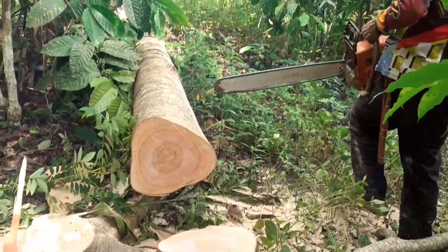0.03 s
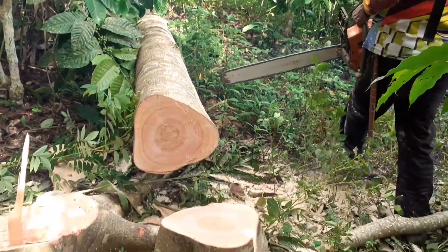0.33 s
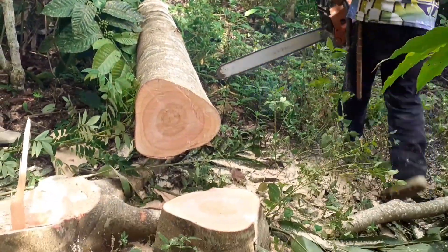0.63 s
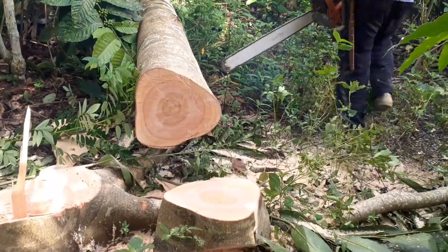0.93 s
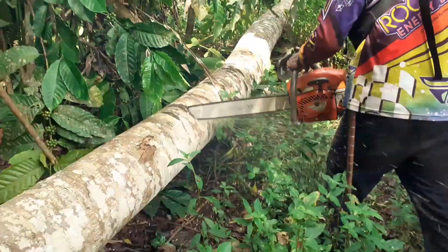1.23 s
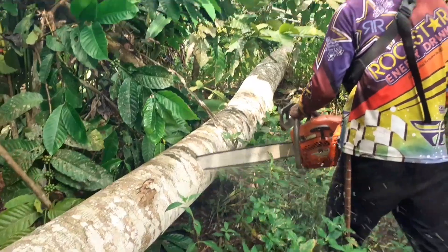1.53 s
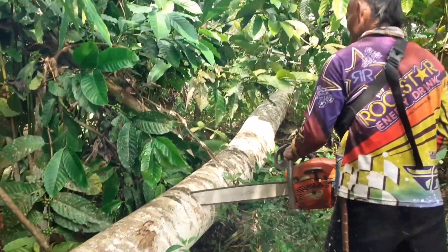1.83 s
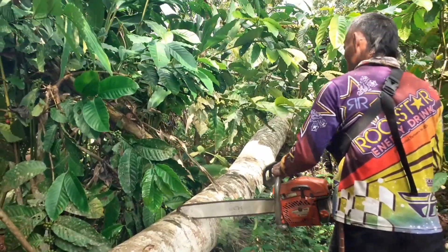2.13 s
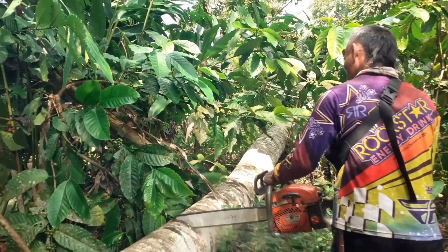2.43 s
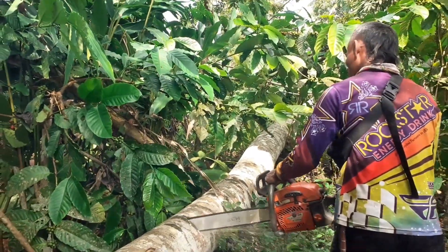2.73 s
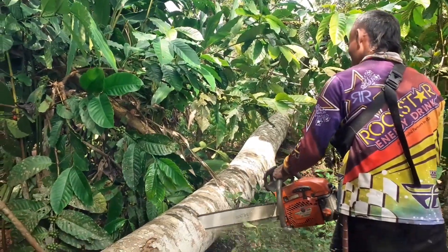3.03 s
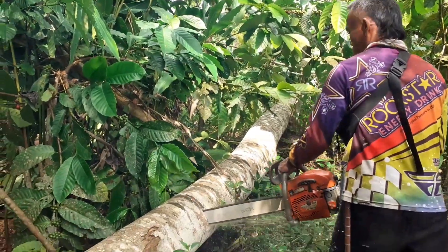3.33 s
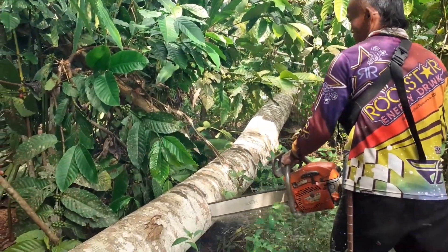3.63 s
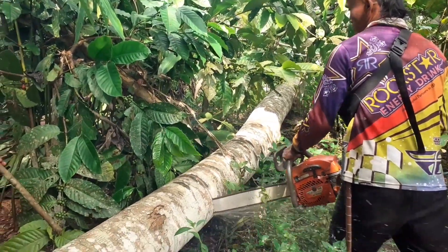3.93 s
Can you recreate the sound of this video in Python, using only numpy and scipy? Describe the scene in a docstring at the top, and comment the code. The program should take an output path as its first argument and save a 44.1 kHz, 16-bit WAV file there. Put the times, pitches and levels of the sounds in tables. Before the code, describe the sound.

Close chainsaw sputtering at idle, then suddenly cutting wood with a loud, rasping roar.

```python
"""A two-stroke chainsaw sinks to a popping idle while its chain coasts to rest and the clutch drum rings.
Hard cut to full throttle in a log, close up: firings ring the muffler, the casing clatters, the chain
rasps and squeals through the wood, and air buffets the microphone underneath.
The throttle is eased once, and the engine stutters back up to speed."""
import sys
import numpy as np
from scipy import signal
from scipy.fft import rfft, irfft
from scipy.io import wavfile
from scipy.ndimage import uniform_filter1d

SR = 44100
rng = np.random.default_rng(int(sys.argv[2]) if len(sys.argv) > 2 else 0)


def master(y):
    """Save y as 16-bit WAV."""
    cut = np.clip(np.atleast_2d(y).T, -1, 1)
    pcm = np.round(cut * 32767)  # scale
    wavfile.write(sys.argv[1], SR, pcm.astype(np.int16))


N = 176400

# wind rumble: freq_hz, gain_db, left_over_right_db
WIND_EQ = [(25, -47, 0), (61, -8, 10.5), (109, -4.5, 12.5), (169, -5, 6.5), (450, -10.5, 10.5),
           (2000, -53, 4)]
# wind fader: time_s, level_db
WIND_FADER = [(1.13, -38.5), (2.3, -32), (3.2, -36), (4, -55)]
# strongest gusts: peak_s, level_db
WIND_GUSTS = [(1.18, -24.5), (1.39, -33.5), (1.478, -26), (1.709, -29), (1.785, -24), (2.03, -24.5),
              (2.14, -24), (2.305, -23), (2.59, -25.5), (2.99, -22.5), (3.25, -27.5), (3.63, -27)]

# soft idle clatter: freq_hz, gain_db, left_over_right_db
TICKOVER_EQ = [(60, -8, 0), (380, 14.5, -0.5), (1400, -9.5, 4), (2050, -3, 2), (2610, -7, 2),
               (6000, -9.5, -4), (15000, -35, 0)]
# loose links shaking: start_s, level_db
LINK_JINGLES = [(.473, -40), (.58, -48), (.632, -48), (.982, -46), (1.09, -50)]
# chain sliding on the bar: freq_hz, gain_db, left_over_right_db
COAST_EQ = [(500, -6.5, 0), (2000, -3, 3), (3000, -7, 4.5), (4780, -6.5, 5), (5800, -1, -9.5),
            (8330, -2, -12), (9700, -11, 6), (12000, -5.5, 7), (14000, 1, 9), (16000, -4.5, -2)]
# sliding chain fader: time_s, level_db
COAST_FADER = [(0, -33), (.25, -40.5), (.45, -46), (.68, -57.5), (.82, -59), (.98, -47), (1.12, -54)]
# idle revs: time_s, turn_rate_hz
IDLE_REVS = [(0, 48), (.13, 42.9), (.3, 38.2), (.42, 36), (.53, 35.8), (.62, 33.6), (.82, 32.7),
             (.95, 34.4), (1.1, 35)]
# one soft puff: freq_hz, gain_db
PUFF_EQ = [(40, -40), (100, -7.5), (160, -3), (225, -4.5), (305, 4), (450, -4), (600, -3), (880, -19.5),
           (1050, -30), (4000, -72)]
# puff and gulp fader: time_s, level_db
PUFF_FADER = [(0, -36.5), (.25, -34.5), (.42, -37), (.8, -37.5), (1.1, -34)]
# hard firings at idle: near_s, bang_accent_db, jerk_accent_db
IDLE_BANGS = [(.121, -4.5, -22), (.192, -8, -23), (.242, -5.5, -2), (.293, -12, -20), (.373, -3.5, -21),
              (.457, -2.5, -0.5), (.539, -9, -20), (.568, -7, -20), (.626, -7, -19), (.656, -5, -24),
              (.715, -5, -11), (.775, -5.5, -17), (.806, -8.5, -22), (.867, -3, -1.5), (.926, -11.5, -20),
              (.956, -1, -0.5), (1.041, -1, -6)]
# one bang: freq_hz, gain_db
BANG_EQ = [(60, -64), (250, 4.5), (450, 3), (600, 9), (800, -6.5), (1000, -15.5), (1250, -11.5),
           (1600, -43), (4000, -39)]

# casing and chain rattle: freq_hz, gain_db, left_over_right_db
CLATTER_EQ = [(1210, -11.5, -17), (2630, -9, 3.5), (3700, 1.5, 5.5), (5470, 1, -2.5), (6500, -2.5, -7),
              (8500, 2, -2.5), (10200, -15.5, 2), (15700, -2.5, -7)]
# chain binding in the cut: peak_s, length_s, pitch_hz, accent_db
CHAIN_SQUEALS = [(1.18, .12, 3290, -44), (1.31, 0.094, 4200, -35), (1.415, .14, 7120, -33.5),
                 (1.48, 0.11, 4320, -34.5), (1.72, 0.09, 4270, -34.5), (2.34, 0.11, 3700, -38),
                 (2.362, 0.34, 4420, -37.5), (2.626, 0.11, 4130, -32), (2.652, 0.15, 3780, -31),
                 (2.898, .24, 4360, -34.5), (2.88, 0.47, 5600, -41), (3.096, 0.23, 4650, -37.5),
                 (3.35, 0.2, 5470, -37), (3.398, 0.29, 3530, -37.5), (3.524, 0.17, 4400, -34.5),
                 (3.62, 0.23, 4680, -35.5), (3.82, 0.56, 4400, -33.5)]
# teeth in wood: freq_hz, gain_db, left_over_right_db
RASP_EQ = [(60, 3, 21), (360, 0.5, -2), (526, -4.5, 17), (840, 4, 3.5), (1920, 4.5, 4), (2920, 2, -1),
           (4170, 5.5, 0.5), (6000, 5, -3.5), (7400, 4, -4.5), (8400, 3, -13), (9500, -2.5, 3.5),
           (11650, -1, 1.5), (14600, 1, 2), (17000, -32, -1)]
# rasp fader: time_s, level_db
RASP_FADER = [(1.13, -19.5), (1.25, -21), (1.6, -22.5), (1.87, -22), (2.15, -21), (2.4, -22), (2.7, -22),
              (3.3, -23), (4, -24)]
# revs in the cut: time_s, firing_rate_hz
SAW_REVS = [(1.14, 184), (1.28, 178.1), (1.45, 178), (1.57, 179.5), (1.76, 186.8), (1.78, 184.5),
            (1.84, 169.3), (1.885, 154), (2.02, 178.8), (2.1, 187.7), (2.17, 183.4), (2.25, 187.7),
            (2.37, 187.3), (2.55, 181.4), (2.86, 174), (3.07, 175.7), (3.22, 171.5), (3.28, 167.2),
            (3.6, 172.9), (3.98, 176.3)]
# spells where every other firing falters: start_s, end_s, depth_ratio
MISFIRES = [(1.215, 1.26, .45), (1.874, 1.912, .7), (2.12, 2.178, .65)]
# muffler from behind, half turned and side on: freq_hz, gain_db
MUFFLER_REAR_EQ = [(90, -44), (175, -5.5), (360, -3.5), (540, -27), (720, -3), (900, 6.5), (1080, -12),
                   (1255, 2), (1440, -13), (1630, -2.5), (1790, -22), (5000, -29)]
MUFFLER_TURNING_EQ = [(90, -39.5), (183, -6), (372, -1.5), (555, -14), (745, 2.5), (930, 6.5), (1115, -4),
                      (1300, 5.5), (1500, -20), (1680, -17), (1870, -2.5), (2060, -16), (5000, -21.5)]
MUFFLER_SIDE_EQ = [(90, -51), (175, -0.5), (350, 1), (520, -8), (700, -5), (870, 7.5), (1050, -6),
                   (1220, 1), (1400, 7), (1570, -13.5), (2050, -13.5), (2265, -1), (2450, -25.5)]
# exhaust fader: time_s, level_db
EXHAUST_FADER = [(1.13, -21.5), (1.5, -22), (1.76, -22.5), (1.83, -22.5), (1.92, -24.5), (2.06, -23.5),
                 (2.5, -22.5), (3.05, -23), (3.35, -23.5), (4, -22)]
# exhaust phase between the ears, the right mostly ahead: freq_hz, left_minus_right_rad
EXHAUST_EAR_PHASE = [(100, 0.99), (700, -0.81), (950, 0.22), (1200, -1.5), (1460, -1.32), (1890, -0.82),
                     (3000, -1.4)]

CUT_S = 1.129  # the idle gives way to the sawing
EASE_S, REOPEN_S, THROTTLE_MOVE_S = 1.79, 1.88, .0044
TURN_S, HALF_TURNED_S, TURNED_S = 1.75, 2.35, 3.07
FOLIAGE_DECAY_S = .011


def undb(db):
    """Decibels to gain."""
    return 10 ** (np.asarray(db) / 20)


def unit(x):
    """Scale to rms 1."""
    return x / np.sqrt(np.mean(x ** 2))


def times():
    """Time of every sample."""
    return np.arange(N) / SR


def curve(rows):
    """Automation: straight lines through (time_s, value) rows."""
    return np.interp(times(), *np.array(rows).T)


def ramp(start, length):
    """Rise from 0 to 1."""
    return np.clip((times() - start) / length, 0, 1)


def swell(at, length):
    """A bell-shaped rise to 1 and fall."""
    return np.exp(-2 * np.sqrt(2) * ((times() - at) / length) ** 2)


def walk(rate_hz):
    """Smooth random drift at rms 1."""
    size = int(SR / rate_hz)
    steps = np.repeat(rng.standard_normal(N // size + 1), size)
    return unit(uniform_filter1d(uniform_filter1d(steps, size), size)[:N])


def freqs():
    """Frequency of every spectrum bin."""
    return np.maximum(np.arange(N // 2 + 1) * SR / N, 1)


def per_bin(rows, column=1):
    """One column of a spectrum table, interpolated over log frequency."""
    rows = np.array(rows)
    return np.interp(np.log(freqs()), np.log(rows[:, 0]), rows[:, column])


def convolve(x, response):
    """Pass a sound through an impulse response."""
    return irfft(rfft(x, 2 * N) * rfft(response, 2 * N))[..., :N]


def body(x, eq):
    """Ring a minimum-phase body of unit energy with the given spectrum."""
    cepstrum = irfft(np.log(undb(per_bin(eq))))
    cepstrum[1:N // 2] *= 2
    cepstrum[N // 2 + 1:] = 0
    response = irfft(np.exp(rfft(cepstrum)))
    return convolve(x, unit(response) / np.sqrt(N))


def resonate(x, hz, widths_hz):
    """Resonances in series, one per width, gain 1 at their shared centre."""
    for width in widths_hz:
        x = signal.lfilter(*signal.iirpeak(hz, hz / width, fs=SR), x)
    return x


def low_pass(x, hz, order):
    """Roll off the top, without delay."""
    return signal.sosfiltfilt(signal.butter(order, hz, fs=SR, output="sos"), x)


def pan(db):
    """Left and right gains; positive leans left."""
    return undb(np.array([[1], [-1]]) * db / 2)


def colour(x, eq):
    """EQ and pan a stereo sound by frequency, at rms 1."""
    return unit(irfft(rfft(x) * undb(per_bin(eq)) * pan(per_bin(eq, column=2))))


def noise(alike_hz=1360):
    """Stereo noise, narrow below a frequency and wide above."""
    mid, side = rfft(rng.standard_normal((2, N)))
    alike = .85 / (1 + (freqs() / alike_hz) ** 4)
    return unit(irfft(mid * np.sqrt(1 + alike) + np.array([[1], [-1]]) * side * np.sqrt(1 - alike)))


def pulses(at, size):
    """Clicks placed between samples with a windowed sinc."""
    index = (at * SR).astype(int)[:, None] + np.arange(-7, 9)
    offset = index - at[:, None] * SR
    shape = np.sinc(offset) * np.cos(np.pi * offset / 16) ** 2
    return np.bincount(np.clip(index, 0, N).ravel(), (shape * size[:, None]).ravel(), N + 1)[:N]


def hits(at, size, decay_s):
    """An envelope of sharp attacks with dying tails."""
    return convolve(pulses(at, size), np.exp(-times() / decay_s))


def scatter(x, decay_s):
    """Dense dying reflections, different for each ear."""
    response = rng.standard_normal((2, N)) * np.exp(-times() / decay_s)
    return convolve(x, unit(response) / np.sqrt(N))


def wind(gust_s=.013):
    """Air tumbles over the microphone: a low rumble with a few stronger gusts."""
    gusts = sum(undb(db) * np.exp(-((times() - at) / gust_s) ** 2) for at, db in WIND_GUSTS)
    tumble = undb(curve(WIND_FADER) + 4.5 * np.tanh(walk(rate_hz=26)))
    return colour(noise(alike_hz=60), WIND_EQ) * np.hypot(tumble, gusts)


def tickover():
    """A steady noise bed for the idling engine's soft clatter."""
    return undb(-43.5) * colour(noise(), TICKOVER_EQ)


def clutch_drum():
    """The drum rings on one thin, steady note."""
    return undb(-52) * unit(resonate(noise(), hz=4720, widths_hz=(150, 500))) * pan(db=-8.5)


def jingles():
    """Short bright shakes of loose links."""
    at, db = np.array(LINK_JINGLES).T
    shimmer = unit(resonate(noise(), hz=13900, widths_hz=(1800, 1800)))
    return hits(at, undb(db), decay_s=.014) * shimmer * pan(db=6)


def coasting_chain(turn_at, turn_size, jerk_at, jerk_db):
    """The slack chain hisses along the bar, ticks every turn and jerks at each bang."""
    jerks = 2 * hits(jerk_at, undb(jerk_db - 41), decay_s=.0086)
    ticks = hits(turn_at, turn_size * undb(-48), decay_s=.002)
    hiss = colour(noise(), COAST_EQ)
    slide = undb(curve(COAST_FADER) + .97 * walk(rate_hz=180))
    link_grain = undb(2 * walk(rate_hz=1500))
    return hiss * (slide + jerks + ticks) * link_grain


def idle(first_turn_s=.011, intake_lag_turns=.43, gulp_db_per_hz=.74, ear_lag_s=54e-6):
    """An exhaust puff and an intake gulp every turn; some firings bang and jerk the chain."""
    t = times()
    revs = curve(IDLE_REVS)
    turns = np.cumsum(revs) / SR
    fired = np.arange(int(turns[-1]) - 2) + np.interp(first_turn_s, t, turns)
    puff_at, gulp_at = np.interp([fired, fired + intake_lag_turns], turns, t)
    size = undb(rng.standard_normal(len(puff_at)))
    puffs = unit(body(pulses(puff_at, size), PUFF_EQ))
    gulps = unit(resonate(body(pulses(gulp_at, size), PUFF_EQ), hz=307, widths_hz=(310,)))
    gulps *= undb(-13 + gulp_db_per_hz * (revs - revs.min()))
    near_s, bang_db, jerk_db = np.array(IDLE_BANGS).T
    bang_at = puff_at[np.abs(puff_at[:, None] - near_s).argmin(axis=0)]  # snap to the nearest puff
    bangs = 2 * body(pulses(bang_at, undb(bang_db - 5)), BANG_EQ)
    engine = (puffs + gulps) * undb(curve(PUFF_FADER)) + bangs
    ears = np.array([np.interp(t - ear_lag_s, t, engine), engine])  # the saw sits to the right
    metal = coasting_chain(puff_at, size, bang_at, jerk_db) + clutch_drum()
    foliage = undb(-27) * scatter(engine, FOLIAGE_DECAY_S)
    return ears + foliage + metal + jingles() + tickover()


def squeals(fire, q=13):
    """Tugged by each firing, the chain rings resonances of the bar as it binds and frees."""
    out = 0
    for at, length, hz, db in CHAIN_SQUEALS:
        ring = resonate(fire, hz, widths_hz=(hz / q, hz / q))
        bind = swell(at, length)
        ring_rms = np.sqrt(np.average(ring ** 2, weights=bind))
        out += undb(db) * bind * ring / ring_rms
    return out * undb(2.5) * pan(db=-4.5)


def clatter(fire, throttle, level_db=-24.5, eased_db=-5):
    """Firings rattle casing and chain along four paths, whose blend drifts as the saw moves."""
    shares = np.array([walk(rate_hz=4) for _ in range(4)])
    shares /= np.linalg.norm(shares, axis=0)
    rattle = sum(share * scatter(fire, decay_s=.017) for share in shares)
    return colour(rattle, CLATTER_EQ) * undb(level_db + eased_db * (1 - throttle))


def rasp(turns, grain_db=1.5, flutter_db=.64):
    """Teeth tear through wood: gritty noise, pulsing faintly with the engine."""
    pulsing = 1 + .033 * np.cos(2 * np.pi * turns)
    grit = undb(grain_db * walk(rate_hz=1200) + flutter_db * walk(rate_hz=60))
    return colour(noise() * pulsing * grit, RASP_EQ) * undb(curve(RASP_FADER))


def misfire_depth(t):
    """Depth of the stutter at the given times."""
    return sum(depth * ((t > start) & (t < end)) for start, end, depth in MISFIRES)


def barks(turns, decay_turns=.5):
    """Unburnt fuel barks every second turn during a stutter."""
    gas = rng.standard_normal(N) * np.exp(-(turns % 2) / decay_turns)
    bark = unit(resonate(gas, hz=774, widths_hz=(1060, 2120)))
    return bark * misfire_depth(times()) * undb(-24.5)


def firings(turns, jitter_s=1e-5, spread_db=.5, stutter_spread_db=2):
    """One pulse per turn; in a stutter they go strong, weak and uneven."""
    count = np.arange(1, int(turns[-1]))
    at = np.interp(count, turns, times())
    stutter = misfire_depth(at)
    timing, strength = rng.standard_normal((len(at), 2)).T
    limp = 1 + stutter * (-1) ** count
    size = limp * undb((spread_db + stutter_spread_db * stutter) * strength)
    return pulses(at + jitter_s * timing * (1 + 8 * stutter), size)


def exhaust(fire, throttle, snarl_db=5, boom_db=1.5):
    """Firings ring the muffler, dull and boomy off throttle; its colour shifts as the saw turns."""
    rear = 1 - ramp(TURN_S, HALF_TURNED_S - TURN_S)
    side = ramp(HALF_TURNED_S, TURNED_S - HALF_TURNED_S)
    angles = [(rear, MUFFLER_REAR_EQ), (1 - rear - side, MUFFLER_TURNING_EQ), (side, MUFFLER_SIDE_EQ)]
    tone = sum(share * unit(body(fire, eq)) for share, eq in angles)
    top = tone - low_pass(tone, hz=1000, order=6)
    tone += top * (undb(snarl_db * swell(at=1.945, length=.11)) - 1)  # snarl as the revs pick up
    boom = undb(boom_db) * low_pass(tone, hz=820, order=3)
    tone = ((1 - throttle) * boom + throttle * tone) * undb(curve(EXHAUST_FADER))
    right = irfft(rfft(tone) * np.exp(-1j * per_bin(EXHAUST_EAR_PHASE)))
    foliage = undb(-19) * scatter(tone, FOLIAGE_DECAY_S)
    return np.array([tone, right]) * pan(db=2) + foliage


def sawing():
    """The saw in the log: one rev curve drives every layer."""
    turns = np.cumsum(curve(SAW_REVS)) / SR
    throttle = 1 - ramp(EASE_S, THROTTLE_MOVE_S) + ramp(REOPEN_S - THROTTLE_MOVE_S, THROTTLE_MOVE_S)
    fire = firings(turns)
    return clatter(fire, throttle) + squeals(fire) + rasp(turns) + barks(turns) + exhaust(fire, throttle)


def scene():
    """The idle, then a hard cut to sawing and wind."""
    cutting = ramp(CUT_S, .002)
    return (1 - cutting) * idle() + cutting * (sawing() + wind())


def record(dry, low_cut_hz=45, high_cut_hz=15750):
    """Trim the sub-bass and cut the very top steeply."""
    thin = signal.sosfilt(signal.butter(4, low_cut_hz, "high", fs=SR, output="sos"), dry)
    return signal.sosfilt(signal.ellip(12, .2, 70, high_cut_hz, fs=SR, output="sos"), thin)


dry = scene()
out = record(dry)
master(out)
```